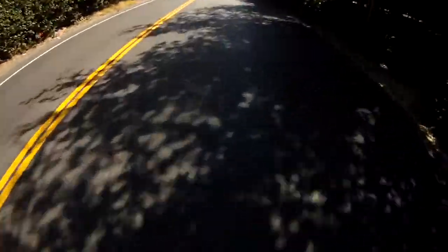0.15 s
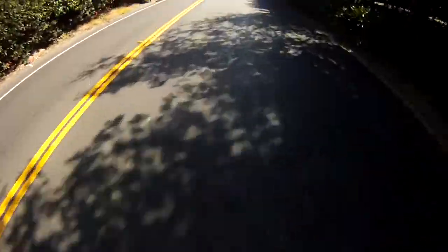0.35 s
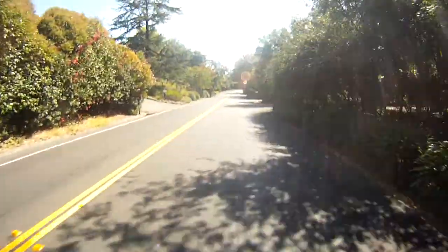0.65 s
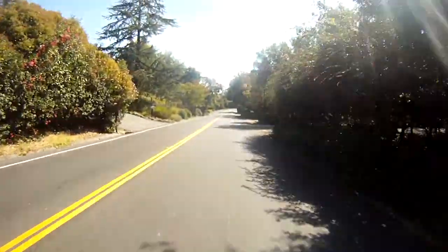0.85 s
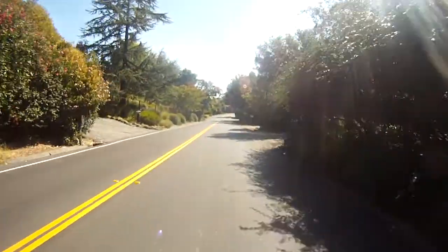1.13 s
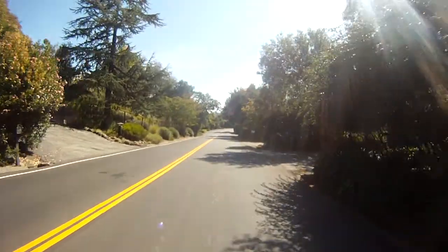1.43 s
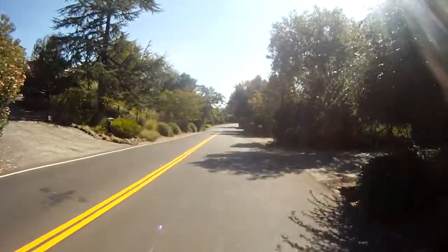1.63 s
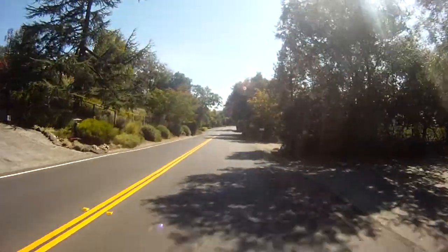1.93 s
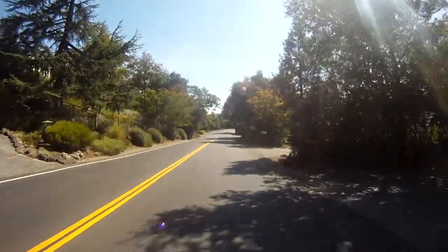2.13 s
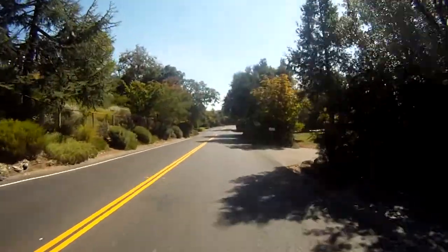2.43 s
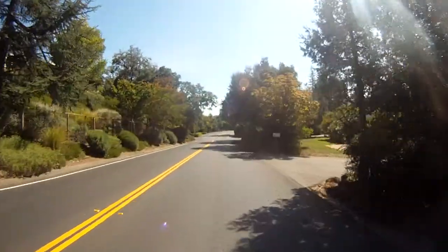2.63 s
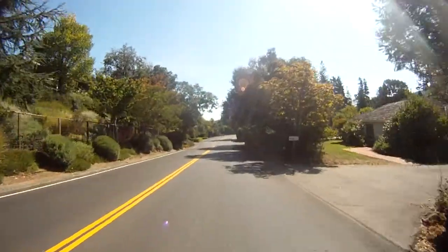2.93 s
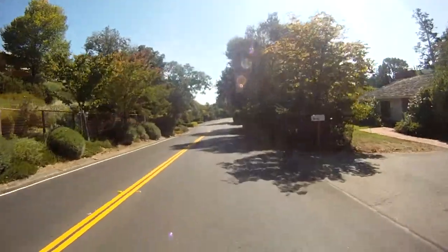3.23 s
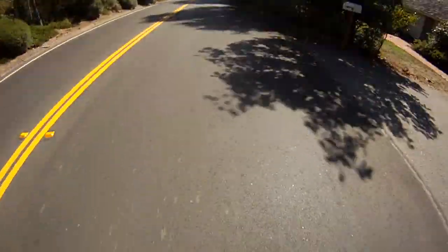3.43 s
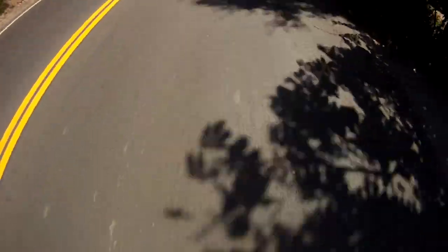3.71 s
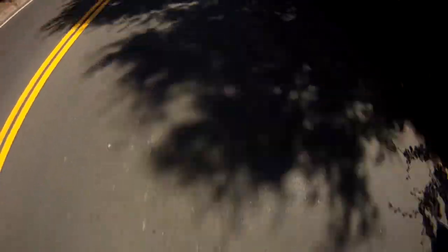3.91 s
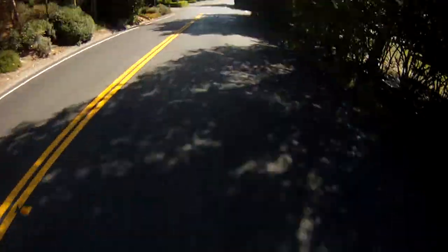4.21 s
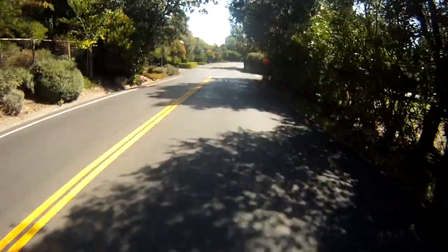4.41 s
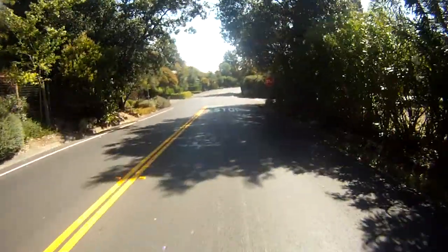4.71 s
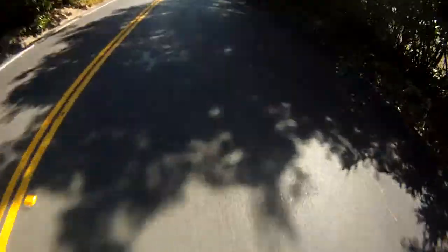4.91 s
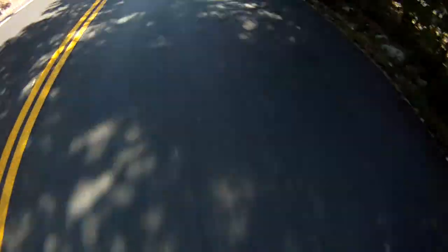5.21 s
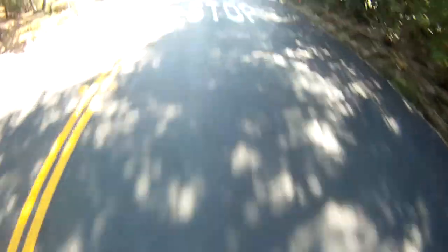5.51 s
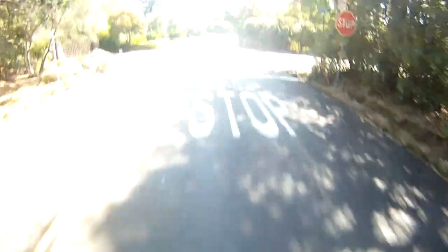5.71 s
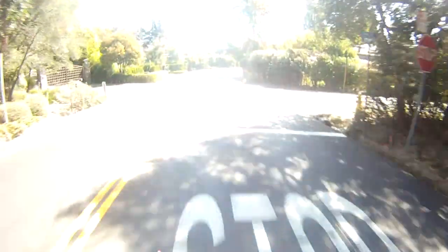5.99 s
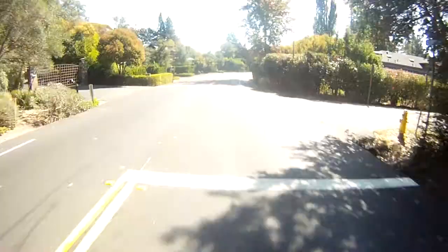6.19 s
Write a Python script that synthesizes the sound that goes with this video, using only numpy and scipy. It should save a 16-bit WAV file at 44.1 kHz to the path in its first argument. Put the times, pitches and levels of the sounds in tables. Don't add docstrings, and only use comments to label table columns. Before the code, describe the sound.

Close, boxed-in helmet microphone outdoors: continuous wheel noise on smooth asphalt, never pausing. Small rough patches make the board boom and hum softly. Wind whistles in uneven gusts, most tonal around three seconds, then suddenly fades and the roar becomes duller for half a second. It comes back, dips once more after five seconds, and the rolling roar opens up near the end. Head nods add dull low knocks; a harsh low-quality fizz sits on top.

```python
import sys
import numpy as np
from scipy import signal
from scipy.fft import rfft, irfft, next_fast_len
from scipy.io import wavfile
from scipy.ndimage import uniform_filter1d, minimum_filter1d

SR = 44100
rng = np.random.default_rng(int(sys.argv[2]) if len(sys.argv) > 2 else 0)


def volts_from_db(level):
    exponent = np.asarray(level, float) / 20
    return 10 ** exponent


def dump_mix(stems):
    frames = np.atleast_2d(stems).T
    limited = np.clip(frames, -1, 1)
    pcm = np.round(limited * 32767).astype(np.int16)
    wavfile.write(sys.argv[1], SR, pcm)


N = 280035


def level(x, db):
    return x * volts_from_db(db) / np.sqrt(np.mean(x ** 2))


def walk(rate):
    hold = int(SR / rate)
    held = np.repeat(rng.standard_normal(N // 200), hold)[:N]
    slewed = uniform_filter1d(uniform_filter1d(held, hold), hold)
    return level(slewed, 0)


def noise():
    return rng.standard_normal(N)


def grit(spread_db, rate):
    return noise() * volts_from_db(spread_db * walk(rate))


def colour(x, table):
    size = next_fast_len(N)
    hz, db = np.transpose(table)
    log_hz = np.log(np.arange(size // 2 + 1) * SR / size + 1)
    curve_db = np.interp(log_hz, np.log(hz), db, left=-90, right=-90)
    return irfft(rfft(x, size) * volts_from_db(curve_db), size)[:N]


def ring(x, hz, width_hz):
    b, a = signal.iirpeak(hz, hz / (1.55 * width_hz), fs=SR)
    once = signal.lfilter(b, a, x)
    return level(signal.lfilter(b, a, once), 0)


def steady(x, share):
    envelope = np.abs(signal.hilbert(x, next_fast_len(N))[:N])
    return level(x / (envelope + 0.19) ** share, 0)


def swells(rows, attack_s, release_s):
    rows, t = np.array(rows), np.arange(N) / SR
    age, hold = t - rows[:, :1], np.abs(rows[:, 1:2])
    rise = age / attack_s
    fall = 1 - (age - attack_s - hold) / release_s
    shape = np.clip(np.minimum(rise, fall), 0, 1)
    return rows[:, 2:].T @ (shape / np.maximum(shape.sum(axis=0), 1))


# [t/s, openness to the road level/dB, airflow over the housing level/dB]
HEAD_TURNS = [(0, 2, -1), (.2, -2.5, -8), (.47, -2.5, -10), (.64, 0, -2), (.9, -1, 0.5), (1.35, -1, -1),
              (2.6, .5, 0.5), (3.45, 0, -0.5), (3.66, -5.5, -16.5), (4.14, -6, -12.5), (4.3, 0.5, -6),
              (4.76, 2, 1), (4.97, 0.5, -2.5), (5.06, -1.5, -8), (5.52, -3, -12.5), (5.68, 0.5, -6.5),
              (5.86, 4, 0), (6.35, 2, 0)]


def head_turns():
    s, road_db, flow_db = np.transpose(HEAD_TURNS)
    t = np.arange(N) / SR
    return np.interp(t, s, road_db), np.interp(t, s, flow_db)


# [f/Hz, level/dB per Hz]
ROAR_SPECTRUM = [(460, -23.5), (780, -14.5), (860, -12), (935, -4.5), (1020, -7), (1120, -2.5), (1290, -2),
                 (1480, -2.5), (1610, -4), (2050, -1.5), (2080, -12.5), (2140, -3), (2260, -9.5),
                 (2330, -5.5), (2520, -25), (3280, -46), (5540, -120)]
# [start t/s, hold t/s, lift level/dB]
AXLE_SONGS = [
    (.92, 0.24, 5),
    (2.17, .06, 3),
    (3.11, 0.16, 3.5),
    (4.43, .25, 2.5),
    (4.9, .06, 5.5),
    (5.86, 0.056, 4.5),
    (6.05, 0.15, 2.5),
]


def wheels(road_db):
    song_db, = swells(AXLE_SONGS, attack_s=0.015, release_s=0.037)
    roar = level(colour(grit(0.4, 40), ROAR_SPECTRUM), 2.44)
    shell = volts_from_db(-8.5) * ring(grit(0.42, 7.9), hz=1172, width_hz=79)
    axle = steady(ring(noise(), hz=708, width_hz=46.5), 0.28)
    axle_db = -48 + 0.8 * road_db + song_db
    return volts_from_db(-33 + road_db) * (roar + shell) + volts_from_db(axle_db + 0.6) * axle


# [f/Hz, level/dB per Hz]
DECK_BED = [(18, -3), (30, -2), (45, -5), (90, 4.5), (130, 4.5), (170, 7.5), (230, 0), (300, 1), (380, 1),
            (445, 2), (520, -1), (620, 1), (850, -7), (1300, -13)]
# [start t/s, hold t/s, deck lift level/dB, truck lift level/dB]
ROUGH_PATCHES = [(.15, 0.056, 3, -1), (.36, 0.063, 5.5, -2.5), (.52, 0.23, 2.5, 3.5), (.76, .08, -1, 8),
                 (.89, .05, 2, 3), (1.19, .05, 5, 0.5), (1.33, 0.086, -1, 4.5), (1.75, 0.058, 6, 1),
                 (2.01, 0.046, 4, -1), (2.49, 0.11, -3, 6.5), (2.68, 0.19, -1, 3.5), (2.94, 0.047, -2, 8.5),
                 (3.04, 0.025, 2, -2), (3.11, 0.033, -2, 6), (3.31, 0.29, -1, 3.5), (3.72, .06, 2.5, 3),
                 (3.88, 0.068, 5.5, -16), (4.16, 0.1, 8.5, 8.5), (4.31, 0.035, 9, 3), (4.45, 0.21, 2, 3.5),
                 (4.78, 0.064, 4, 9), (5.16, .14, 6, -1), (5.36, 0.15, 0, 4), (5.56, 0.049, 6, -6),
                 (5.74, 0.083, 9.5, 1), (5.87, .05, 5, 5), (5.96, 0.069, 9.5, -2), (6.1, 0.057, 3.5, 10),
                 (6.28, .05, 2, 7)]


def board(road_db):
    deck_db, truck_db = swells(ROUGH_PATCHES, attack_s=0.015, release_s=0.037)
    boom = steady(ring(noise(), hz=57.3, width_hz=16.9), 0.3)
    hum = steady(ring(noise(), hz=192.4, width_hz=19.2), 0.56)
    bed = level(colour(grit(0.42, 9), DECK_BED), 4.3)
    boom_db = -44.5 + deck_db
    hum_db = -48 + 0.14 * road_db + truck_db
    rumble_db = -47 + 0.55 * road_db + 0.088 * truck_db
    return volts_from_db(boom_db + 1.5) * boom + volts_from_db(hum_db + 0.5) * hum + volts_from_db(rumble_db) * bed


# [f/Hz, level/dB per Hz]
CAVITY_SPECTRUM = [(1300, -33), (1650, -12), (1850, -12), (1960, -1), (2070, -2.5), (2200, -3.5),
                   (2400, -10), (2700, -30), (3400, -24.5), (4100, -38.5), (4700, -31), (4960, -27),
                   (5400, -29), (6000, -49)]
# [f/Hz, level/dB per Hz]
EDGE_SPECTRUM = [(2250, -20), (2450, 1.5), (2680, 1), (2950, -5.5), (3300, -16.5), (3900, -16)]
# [f/Hz, level/dB per Hz]
HISS_SPECTRUM = [(1760, -47), (3000, -1.5), (3100, 1), (3130, -6.5), (3380, -0.5), (3650, -2), (3950, -9),
                 (4510, -10.5), (5080, -8), (5600, -13), (5950, -17.5), (7740, -56), (13100, -120)]
# [start t/s, hold t/s, whistle lift level/dB, edge tone lift level/dB]
GUSTS = [(.03, 0.015, 6, 1), (1.04, 0.019, 3, 0), (1.395, 0.097, 7.5, 8.5), (1.53, 0.099, 8.5, 3.5),
         (1.7, .15, 5.5, 2), (1.9, 0.1, 6.5, 1), (2.09, .04, 0.5, 2.5), (2.17, 0.064, 3, 1.5),
         (2.26, 0.037, 6, 1), (2.36, 0.072, 4.5, 0.5), (2.5, 0.26, 2.5, 0.5), (2.69, .11, 5, 4),
         (2.84, 0.0041, 10.5, -4), (2.875, .05, 13, 7), (2.96, .12, 11.5, 5), (3.11, 0.09, 10.5, 7.5),
         (3.23, .07, 7.5, 4), (3.37, .08, 2, 0.5), (4.66, .05, 0.5, -0.5), (4.9, 0.046, 1, -2),
         (5.26, 0.18, 2, 1.5), (3.47, .05, -0.5, 1), (5.44, 0.066, -3, -4)]


def wind(road_db, flow_db):
    gust_db, edge_lift_db = swells(GUSTS, attack_s=0.011, release_s=0.05)
    late_flow_db = np.interp(np.arange(N) - 0.062 * SR, np.arange(N), flow_db)
    whistle_db = -30.5 + 0.89 * flow_db + gust_db
    edge_db = -36 + flow_db + edge_lift_db
    hiss_db = -40 + 0.39 * late_flow_db + 0.58 * road_db + 0.079 * gust_db
    locked_db = -40.5 + flow_db + 1.35 * gust_db

    flutter = volts_from_db(0.59 * walk(29.59))
    whistle = level(steady(colour(grit(1.0, 7.9), CAVITY_SPECTRUM), 0.086), -0.75)
    edge = level(colour(grit(0.26, 48), EDGE_SPECTRUM), -0.36)
    hiss = level(colour(grit(0.28, 120), HISS_SPECTRUM), 0.36)
    locked = steady(ring(noise(), hz=2055, width_hz=94), 0.26)
    shed = volts_from_db(whistle_db) * whistle + volts_from_db(edge_db) * edge + volts_from_db(hiss_db) * hiss
    return flutter * shed + volts_from_db(locked_db) * locked


# [start t/s, hold t/s, sway lift level/dB]
NODS = [(.12, 0.067, 25.5), (1.52, .01, 4), (2.45, .05, 6), (3.42, .05, 19), (3.56, .04, 28.5),
        (3.8, 0.2, 16), (4.42, .03, 14), (4.81, 0.033, 23), (5.04, 0.048, 20), (5.62, .04, 15),
        (6.1, .01, 11)]


def nods():
    nod_db, = swells(NODS, attack_s=0.029, release_s=0.22)
    sway = steady(ring(noise(), hz=13.3, width_hz=4.2), 0.59)
    thump = ring(grit(3.8, 18), hz=30, width_hz=11)
    return volts_from_db(-58 + nod_db) * sway + volts_from_db(-55 + 0.55 * nod_db) * thump


def scene():
    road_db, flow_db = head_turns()
    mix = wheels(road_db) + board(road_db) + wind(road_db, flow_db) + nods()
    return mix[None]


def limit(x):
    gain = np.minimum(1, volts_from_db(-8.5) / (np.abs(x) + 1e-9))
    return x * uniform_filter1d(minimum_filter1d(gain, size=300), size=300)


def sample_and_hold(x):
    guard = signal.cheby1(4, .5, 5400, fs=SR, output="sos")
    low = signal.resample_poly(signal.sosfilt(guard, x), 40, 147, axis=1)
    held = np.repeat(np.pad(low, ((0, 0), (0, 2))), 4, axis=1)
    out = signal.resample_poly(held, 147, 160, axis=1)[:, :N]
    top_cut = signal.ellip(14, .2, 90, 15280, fs=SR, output="sos")
    return signal.sosfilt(top_cut, out)


def band(x, edges_hz):
    sos = signal.butter(6, edges_hz, "bandpass", fs=SR, output="sos")
    return signal.sosfiltfilt(sos, x)


def empty_valley(x):
    whistle_power = uniform_filter1d(band(x, (9300, 11000)) ** 2, size=1024)
    loud = whistle_power > volts_from_db(2 * -41 + 4 * walk(35))
    return x - uniform_filter1d(1. * loud, size=512) * band(x, (11450, 12550))


def roll_off(x):
    return signal.sosfilt(signal.butter(12, 16010, fs=SR, output="sos"), x)


def record(dry):
    mix = empty_valley(sample_and_hold(limit(dry)))
    return roll_off(mix)


dry = scene()
out = record(dry)
dump_mix(out)
```